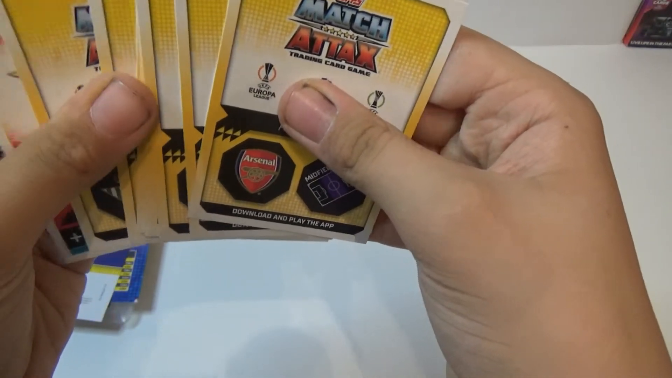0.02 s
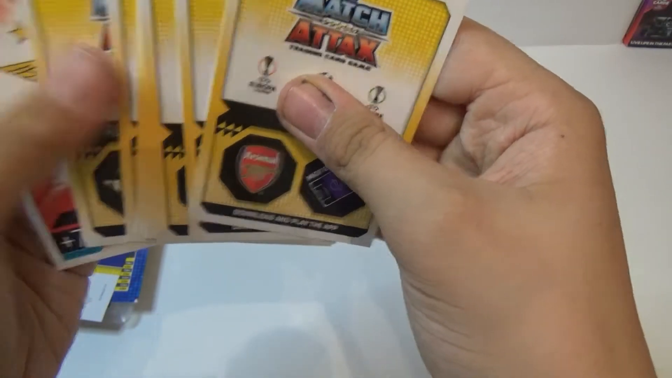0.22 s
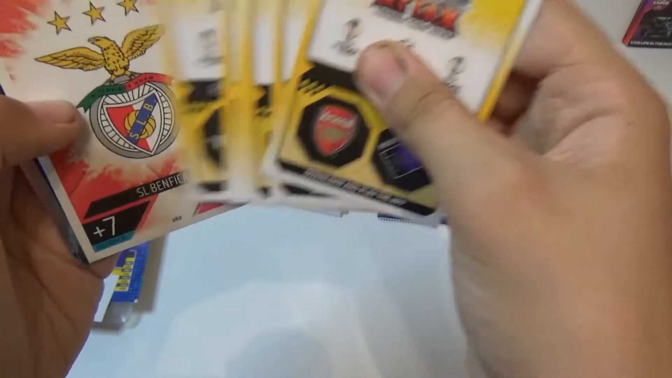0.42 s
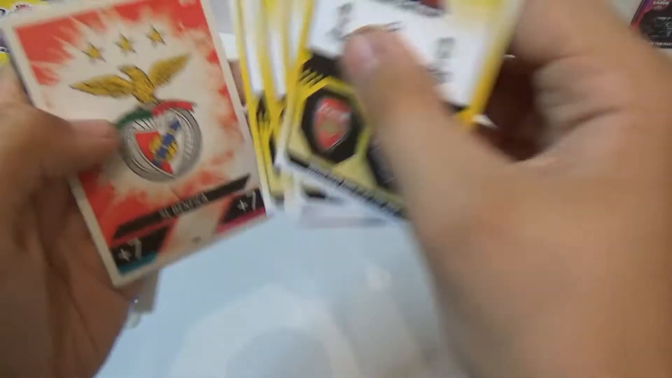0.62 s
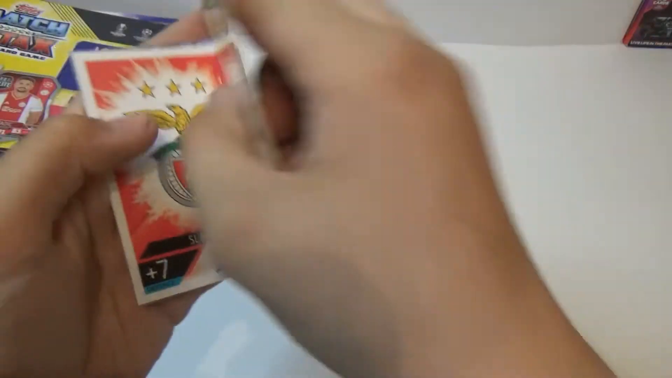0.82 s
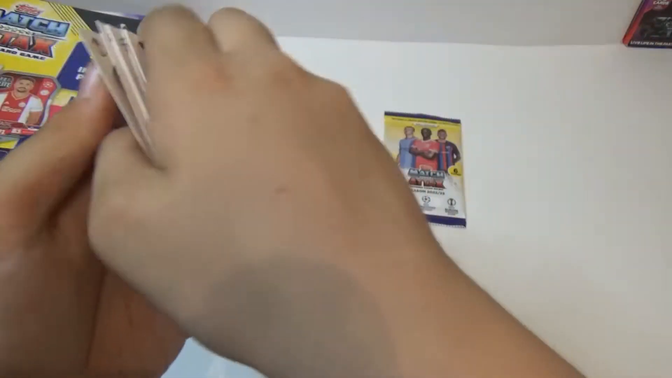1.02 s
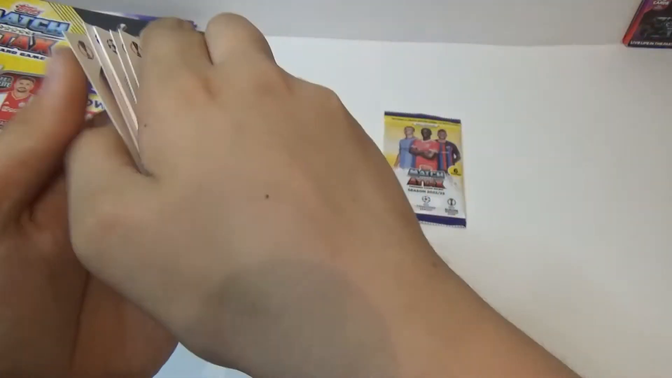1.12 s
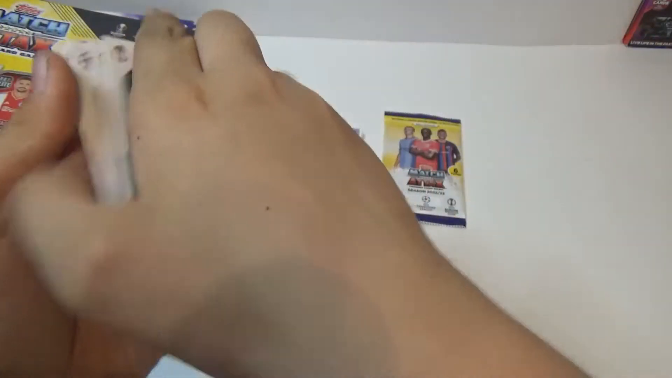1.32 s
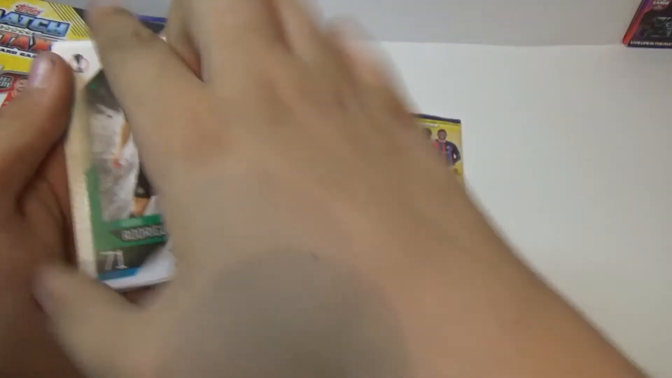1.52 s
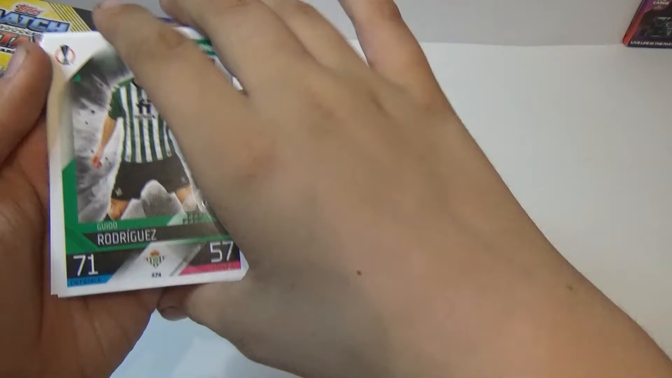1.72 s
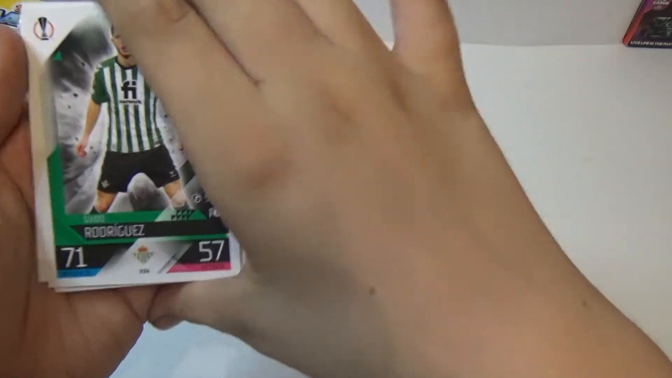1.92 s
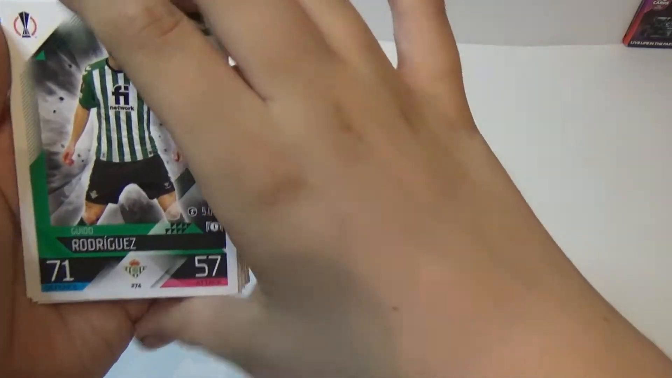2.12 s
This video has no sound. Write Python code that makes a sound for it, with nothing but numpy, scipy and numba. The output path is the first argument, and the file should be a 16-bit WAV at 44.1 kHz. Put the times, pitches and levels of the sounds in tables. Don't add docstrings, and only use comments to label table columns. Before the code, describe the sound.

Stiff coated cards slip and flick between two hands, one drawn out with a bright hiss, then the stack clacks sharply together and keeps rustling; close, dry indoor sound with faint camera ticking and hiss.

```python
import sys
import numpy as np
from scipy import signal
from scipy.fft import rfft, irfft
from scipy.io import wavfile
from numba import njit

SR = 44100
rng = np.random.default_rng(int(sys.argv[2]) if len(sys.argv) > 2 else 0)


def to_linear_factor(level_db):
    exponent = np.asarray(level_db, float) / 20
    return 10 ** exponent


def log_audio(samples):
    frames = np.atleast_2d(samples).T
    limited = np.clip(frames, -1, 1)
    pcm = np.round(limited * 32767).astype(np.int16)
    wavfile.write(sys.argv[1], SR, pcm)


N = 97020
T = np.arange(N) / SR


def at_hz(points, hz):
    p = np.array(points)
    return np.interp(np.log(hz), np.log(p[:, 0]), p[:, 1])


def rms_one(x):
    return x / np.sqrt(np.mean(x ** 2) + 1e-20)


def colour(x, points):
    hz = np.maximum(np.fft.rfftfreq(N, 1 / SR), 10)
    return rms_one(irfft(rfft(x) * to_linear_factor(at_hz(points, hz)), N))


def drift(rate_hz):
    r = np.exp(-2 * np.pi * rate_hz / SR)
    white = rng.standard_normal(N + SR)
    return rms_one(signal.lfilter([1], [1, -2 * r, r * r], white)[SR:])


def hump(s, rise, fall):
    return np.exp(-2 * ((T - s) / np.where(T < s, rise, fall)) ** 2)


def ring(hz, t60, t):
    return np.sin(2 * np.pi * hz * t) * to_linear_factor(-60 * np.maximum(t, 0) / t60) * (t > 0)


@njit
def sweep(x, hz, r, sr):
    y = np.zeros(len(x))
    for i in range(2, len(x)):
        drive = x[i] - x[i - 2]
        y[i] = drive + 2 * r * np.cos(2 * np.pi * hz[i] / sr) * y[i - 1] - r * r * y[i - 2]
    return y


def resonate(x, hz, width_hz):
    return rms_one(sweep(x, hz + np.zeros(N), np.exp(-np.pi * width_hz / SR), SR))


def friction():
    grains_per_s, spread_db, flicker_db = 30000, 1.6, 0.8
    size_db = spread_db * np.minimum(rng.exponential(1, N), 3.5)
    grains = to_linear_factor(size_db) * rng.standard_normal(N) * (rng.random(N) < grains_per_s / SR)
    return rms_one(grains * to_linear_factor(flicker_db * drift(200)))


def patchy(x):
    patchy_db, patches_per_s = 1.8, 70
    spectrum, hz = rfft(x), np.fft.rfftfreq(N, 1 / SR)
    centres = np.linspace(0, 16800, 22)
    out = np.zeros(N)
    for centre in centres:
        share = np.clip(1 - abs(hz - centre) / centres[1], 0, 1)
        out += irfft(spectrum * share, N) * to_linear_factor(patchy_db * drift(patches_per_s))
    return rms_one(out)


# start_s, level_db, edge_pitch_hz
CARD_DRAW = [
    (.36, -67, 5040),
    (.41, -49, 5450),
    (.44, -34.5, 5400),
    (0.483, -32, 5900),
    (0.496, -33, 7360),
    (.52, -36.5, 7500),
    (0.543, -37, 7640),
    (.565, -72, 7500),
]
# pitch_hz, level_db
DRAW_HISS_SPECTRUM = [(1470, -54), (2500, -46.5), (3040, -15), (4340, -11.5), (9220, 4.5), (13400, -8),
                      (16000, -20)]
# pitch_hz, level_db
DRAW_BODY_SPECTRUM = [(350, -25), (600, -7.5), (850, -5), (1200, 1), (1800, -1), (2500, -5.5),
                      (3300, -12.5), (5000, -21)]


def card_draw(plain, grains):
    hiss_db, body_db, edge_db = -0.5, -8.5, -5.5
    edge_width_hz, edge_leads_s = 1400, 0.0088
    s, db, hz = np.transpose(CARD_DRAW)
    pull = to_linear_factor(np.interp(T, s, db, -99, -99))
    early_pull = to_linear_factor(np.interp(T + edge_leads_s, s, db, -99, -99))
    edge_hz = np.interp(T, s, hz)
    edge = resonate(resonate(plain, edge_hz, edge_width_hz), edge_hz, 2 * edge_width_hz)
    hiss = pull * to_linear_factor(hiss_db) * colour(grains, DRAW_HISS_SPECTRUM)
    body = pull * to_linear_factor(body_db) * colour(grains, DRAW_BODY_SPECTRUM)
    return hiss + body + to_linear_factor(edge_db) * early_pull * edge, pull


# start_s, rustle_level_db, left_over_right_db
HANDLING_PRESSURE = [(0.0, -55.5, 1.5), (0.15, -55, 1.5), (0.32, -56.5, 2.5), (0.45, -48, 0.5),
                     (0.64, -49.5, 0), (1.08, -49, 1.5), (1.34, -53.5, 2.5), (1.38, -47.5, 2.5),
                     (1.51, -58, 2), (2.17, -59.5, 1), (2.2, -56, -2.5)]
# peak_s, rise_s, fall_s, level_db, body_over_hiss_db
SHORT_RUBS = [(0.129, 0.041, 0.019, -49, -19.5), (.239, .0021, 0.0051, -37, -34),
              (.315, .002, 0.13, -48.5, -23), (.668, 0.0041, 0.007, -39, -5.5), (.72, .004, .012, -49, -15),
              (.735, 0.096, .036, -42.5, -7), (0.759, 0.021, 0.057, -36, -6),
              (0.832, 0.035, 0.065, -38, -10.5), (0.834, 0.0071, 0.0066, -37, -7),
              (.896, 0.0021, 0.0032, -45.5, -3), (.982, 0.0036, 0.0081, -48, 1),
              (1.09, .03, 0.073, -49.5, -12), (1.16, 0.011, .0173, -47.5, -9), (1.232, .005, .01, -48, -3),
              (1.245, 0.013, .016, -38.5, -6.5), (1.258, 0.0027, 0.0054, -42, -1),
              (1.281, .0024, 0.088, -39.5, -10.5), (1.329, .032, .0118, -34, -11),
              (1.366, .005, .005, -39, -15), (1.367, 0.043, 0.042, -38.5, -20),
              (1.402, 0.0065, 0.0054, -36.5, -14), (1.408, .01, 0.012, -47, -14),
              (1.459, .0113, 0.073, -44.5, -5), (1.495, 0.025, 0.017, -50, -18),
              (1.515, 0.065, 0.035, -44, -22), (1.55, .015, .02, -49, -20),
              (1.731, 0.021, 0.021, -46.5, -10), (1.797, 0.013, 0.03, -46.5, -13),
              (1.875, 0.041, 0.017, -50, -6.5), (1.91, .05, .05, -53.5, -14), (1.96, .057, .0117, -58, 1.5),
              (2.07, 0.0056, .03, -53.5, -9), (2.095, .02, .012, -55.5, -18),
              (2.148, .005, 0.0045, -42, -19), (2.161, 0.035, .009, -48, -16)]
# pitch_hz, level_db
RUB_HISS_SPECTRUM = [(1470, -23.5), (2600, -7.5), (4240, -1), (5440, -1), (9440, 1.5), (10600, -0.5),
                     (12000, -7), (16000, -20)]
# pitch_hz, level_db
RUB_BODY_SPECTRUM = [(300, -11.5), (500, -17.5), (700, -5), (1150, -4), (1800, -1), (2500, -4), (3300, -11),
                     (5000, -36.5)]


def rubbing():
    band_hz, band_width_hz, band_db = 9270, 1080, -17
    plain = friction()
    grains = patchy(plain)
    draw, pull = card_draw(plain, grains)
    s, db, _ = np.transpose(HANDLING_PRESSURE)
    hiss_power = to_linear_factor(np.interp(T, s, db)) ** 2
    body_power = hiss_power * to_linear_factor(-7.5) ** 2
    for s, rise, fall, db, body_db in SHORT_RUBS:
        swell = hump(s, rise, fall)
        hiss_power = hiss_power + (to_linear_factor(db) * swell) ** 2
        body_power = body_power + (to_linear_factor(db + body_db) * swell) ** 2
    hiss = np.sqrt(hiss_power) * colour(grains, RUB_HISS_SPECTRUM)
    body = np.sqrt(body_power) * colour(grains, RUB_BODY_SPECTRUM)
    band = np.sqrt(hiss_power + pull ** 2) * resonate(grains, band_hz, band_width_hz)
    return hiss + body + draw + to_linear_factor(band_db) * band


# peak_s, half_length_s, level_db, pitch_hz
CARD_SQUEAKS = [(.225, .0015, -43, 3800), (.2255, .0025, -41, 1400), (.2865, .002, -46, 3200),
                (.2866, .002, -47, 5000), (.483, .004, -38, 6000), (.486, .02, -46, 1215),
                (.523, .004, -39, 9200), (.537, .005, -44, 1600), (.666, .0062, -47.5, 7500),
                (.6845, .003, -39, 760), (.685, .003, -43, 420), (.7497, .002, -28, 3700),
                (.7499, .0022, -21, 1850), (.7562, .0015, -28, 3750), (.757, .008, -43, 540),
                (.791, .003, -41, 3100), (1.161, .003, -39, 2430), (1.165, .008, -48, 9000),
                (1.168, .004, -47, 2500), (1.249, .0079, -48, 9300), (1.2825, .0044, -43, 2626),
                (1.327, .0103, -33.5, 9145), (1.328, .005, -33.5, 4235), (1.3281, .0049, -32, 10420),
                (1.331, .0049, -30.5, 2553), (1.368, .0067, -36, 6940), (1.4, .0069, -45, 6000),
                (1.402, .005, -39, 4230), (1.403, .006, -41, 5000), (1.457, .0052, -46, 4580),
                (1.46, .007, -48, 9800), (1.496, .007, -47, 6100), (1.5, .008, -46, 9400),
                (1.537, .003, -50, 2750), (2.021, .004, -53, 2750)]


def squeaks():
    relative_width, roughness = 0.052, 0.304
    white, out = rng.standard_normal(N), np.zeros(N)
    for s, half, db, hz in CARD_SQUEAKS:
        tone = np.sqrt(2) * np.sin(2 * np.pi * hz * T)
        skirt = roughness * hz / 4000 * resonate(white, hz, relative_width * hz)
        out += to_linear_factor(db) * hump(s, half, 0.52 * half) * (tone + skirt)
    return out


# start_s, thud_level_db, thud_pitch_hz, crack_level_db, edge_pitch_hz
EDGE_SNAPS = [(.2240, -33.5, 736, -29, 5200), (.2408, -45, 1260, -36, 8320),
              (0.2859, -35.5, 1160, -34, 3850), (0.3148, -40, 1120, -34.5, 8250),
              (0.6831, -26, 1270, -29, 2090), (.733, -43, 1620, -32, 3470), (.7481, -15, 1640, -19.5, 3680),
              (0.7559, -17, 1260, -17, 3780), (.757, -32, 700, -25, 6000), (.7735, -25.5, 1390, -32, 6400),
              (0.7896, -29, 805, -29.5, 9100), (.8937, -43.5, 2340, -29.5, 10800),
              (0.9759, -36, 2380, -26, 9500), (1.198, -59, 3100, -43, 5000), (1.5222, -41, 2030, -43, 9000),
              (2.148, -39.5, 1840, -45, 8900)]
# pitch_hz, level_db
CRACK_SPECTRUM = [(900, -32), (1500, -6), (3900, -9.5), (6500, -5.5), (9500, -5.5), (11500, -8.5),
                  (13500, -20), (16000, -19)]


def snaps():
    rise_s, hold_s, crack_t60_s, edge_t60_s = 0.00025, 0.004, 0.0095, 0.0047
    twin_ratio, twin_db = 0.77, -9
    click_hz, click_db, click_t60_s = 7500, -30, 0.00074
    out, crackle = np.zeros(N), colour(rng.standard_normal(N), CRACK_SPECTRUM)
    for s, db, hz, crack_db, edge_hz in EDGE_SNAPS:
        t = T - s
        modes = ring(hz, 0.06, t) + to_linear_factor(twin_db) * ring(hz * twin_ratio, 0.035, t)
        out += to_linear_factor(db - 4.5) * hump(s + rise_s, rise_s, hold_s) * modes
        crack_decay = to_linear_factor(-60 * np.maximum(t, 0) / crack_t60_s) * (t > 0)
        out += to_linear_factor(crack_db - 3.5) * crackle * crack_decay
        out += to_linear_factor(crack_db) * ring(edge_hz, edge_t60_s, t)
        out += to_linear_factor(crack_db + click_db) * ring(click_hz, click_t60_s, t)
    return out


# peak_s, level_db, centre_pitch_hz
EDGE_FLICKS = [(.2243, -23, 7200), (.2386, -35, 9000), (0.24, -24, 9000), (.2856, -34, 8600),
               (.3147, -28, 10000), (0.4705, -29, 8000), (.4830, -24, 7000), (0.522, -23, 9000),
               (.6833, -23, 2300), (.7190, -31, 6000), (.7340, -36, 3500), (.7483, -9.5, 3950),
               (.7560, -16, 4000), (.7900, -30, 8500), (.8940, -25, 9500), (.9760, -30, 8000),
               (.9840, -31, 6000), (1.1990, -32.5, 4000), (1.5227, -23.5, 8900), (1.722, -36, 8000),
               (1.7912, -39, 9000), (2.1460, -35, 8000)]


def flicks():
    pulses = np.zeros(N)
    for s, db, hz in EDGE_FLICKS:
        phase = 2 * np.pi * hz * (T - s)
        pulses -= to_linear_factor(db) * phase * np.exp(0.5 - phase ** 2 / 2)
    return signal.sosfilt(signal.butter(2, 20000, fs=SR, output="sos"), pulses)


# peak_s, level_db, pitch_hz
PALM_THUMPS = [
    (.686, -60, 190),
    (.695, -66, 80),
    (.752, -53, 370),
    (.759, -49, 165),
    (.768, -62, 70),
    (.777, -54, 260),
    (.80, -60, 210),
    (.99, -59, 220),
]


def thumps():
    rise_s, fall_s = 0.008, 0.012
    out = np.zeros(N)
    for s, db, hz in PALM_THUMPS:
        out += to_linear_factor(db) * hump(s, rise_s, fall_s) * np.sin(2 * np.pi * hz * (T - s))
    return out


def room(x):
    tail_db, t60_s, cut_hz = -13, 0.062, 10100
    t = T[:SR // 4]
    tail = rng.standard_normal((2, len(t))) * to_linear_factor(-60 * t / t60_s) * (t > 0.0015)
    tail = signal.sosfilt(signal.butter(2, cut_hz, fs=SR, output="sos"), tail)
    tail = tail / np.sqrt(np.sum(tail ** 2) / 2)
    return to_linear_factor(tail_db) * signal.fftconvolve(x[None], tail)[:, :N]


def ticks():
    first_s, half_period_s, attack_s, t60_s = 0.0149, 0.04, 0.00059, 0.015
    tick_hz, tick_db, weak_db, accent_db = 2760, -44, -7, 4
    out = np.zeros(N)
    for k in range(56):
        level_chance, pitch_chance = rng.standard_normal(2)
        db = tick_db + weak_db * (k % 2) + accent_db * (k % 10 == 0) + level_chance
        hz = tick_hz * (1 + 0.025 * pitch_chance)
        t = T - (first_s + k * half_period_s)
        out += to_linear_factor(db) * ring(hz, t60_s, t) * np.minimum(t / attack_s, 1)
    return out


# pitch_hz, level_db
FLOOR_SPECTRUM = [(24, -49), (60, -15), (337, 0), (1340, 1), (2600, -3), (4800, -9), (9450, -17.5),
                  (15500, -11)]
# pitch_hz, likeness (1 = the same in both)
FLOOR_LIKENESS = [(30, 1), (70, 0.71), (140, 1), (280, 0.6), (600, 0.046), (1650, 0.053), (5000, 0.48),
                  (15000, 0.98)]


def floor():
    mid, side = rfft(rng.standard_normal((2, N)))
    hz = np.maximum(np.fft.rfftfreq(N, 1 / SR), 10)
    alike = np.clip(at_hz(FLOOR_LIKENESS, hz), 0, 1)
    pair = np.sqrt(1 + alike) * mid + np.sqrt(1 - alike) * side * [[1], [-1]]
    return to_linear_factor(-53) * rms_one(irfft(pair * to_linear_factor(at_hz(FLOOR_SPECTRUM, hz)), N))


def scene():
    no_bass = signal.butter(3, 314, "high", fs=SR, output="sos")
    cards = signal.sosfilt(no_bass, rubbing() + squeaks() + snaps() + flicks())
    s, _, pan_db = np.transpose(HANDLING_PRESSURE)
    pan = to_linear_factor(np.interp(T, s, pan_db) * [[0.5], [-0.5]])
    return cards * pan + room(cards) + thumps() + ticks() + floor()


def low_pass(x):
    return signal.sosfilt(signal.butter(12, 16510, fs=SR, output="sos"), x)


def record(dry):
    top_cut = signal.cheby2(14, 60, 16350, fs=SR, output="sos")
    mix = signal.sosfilt(top_cut, dry)
    return low_pass(mix)


dry = scene()
out = record(dry)
log_audio(out)
```